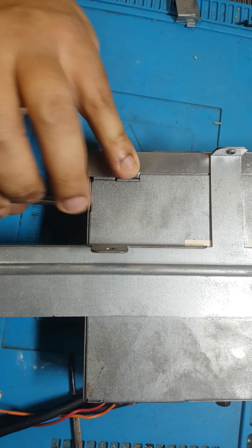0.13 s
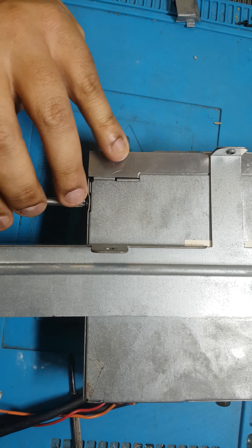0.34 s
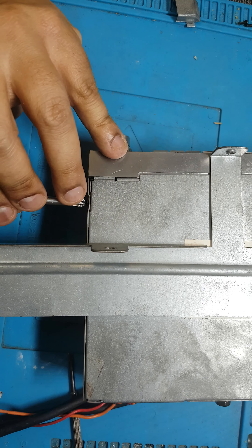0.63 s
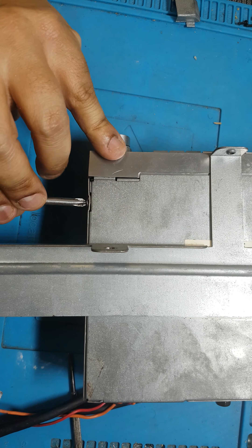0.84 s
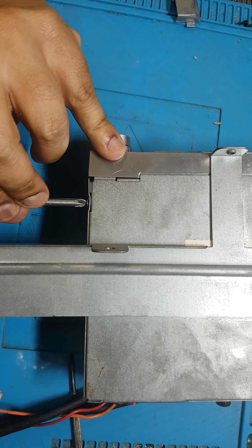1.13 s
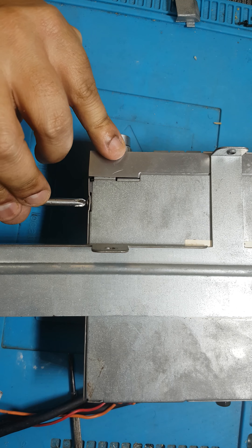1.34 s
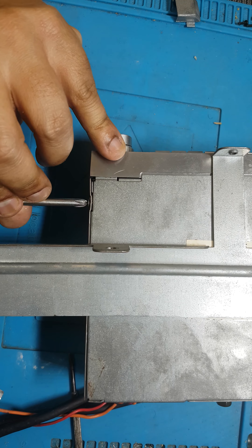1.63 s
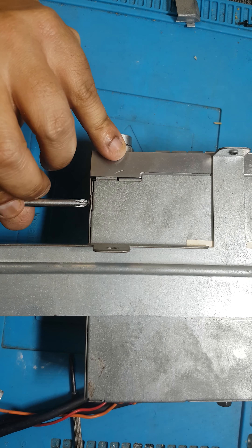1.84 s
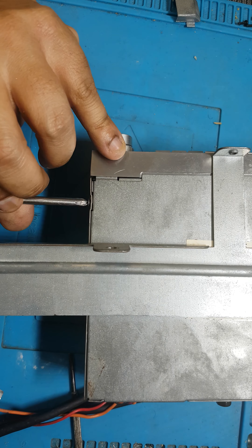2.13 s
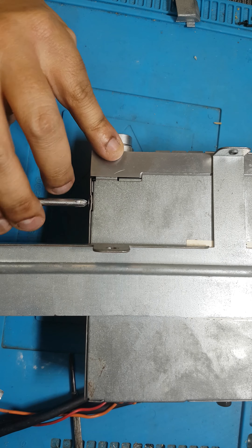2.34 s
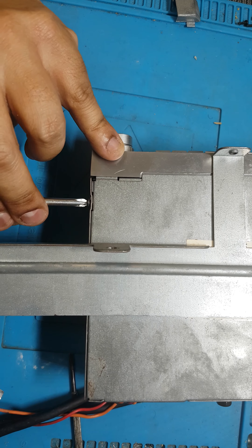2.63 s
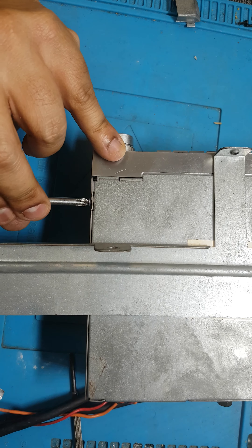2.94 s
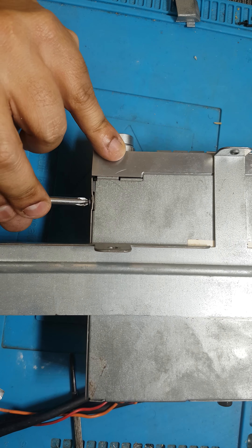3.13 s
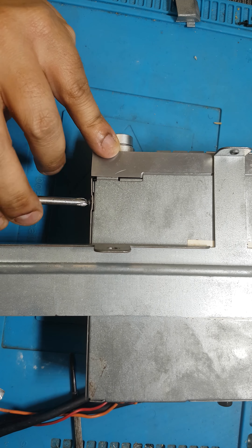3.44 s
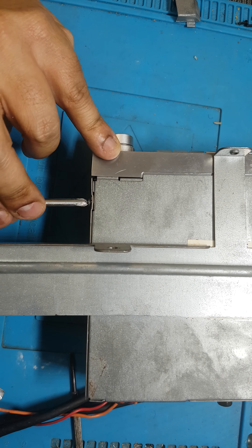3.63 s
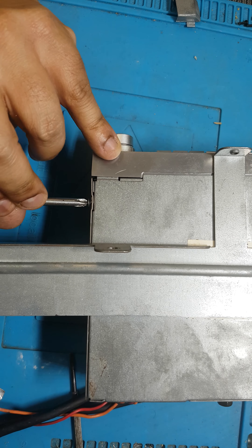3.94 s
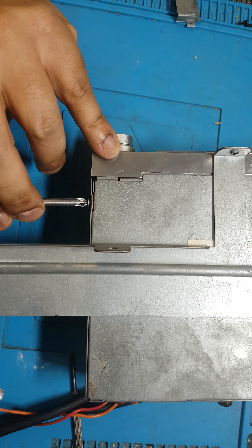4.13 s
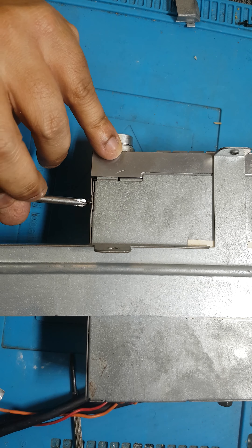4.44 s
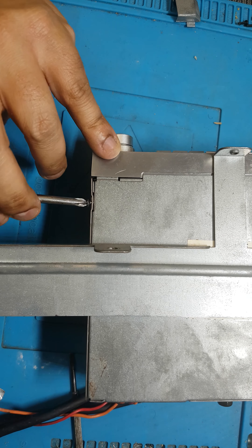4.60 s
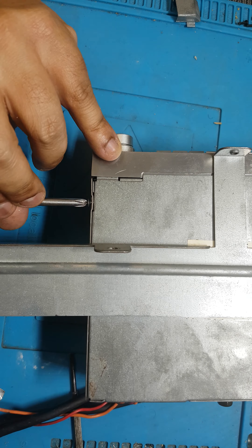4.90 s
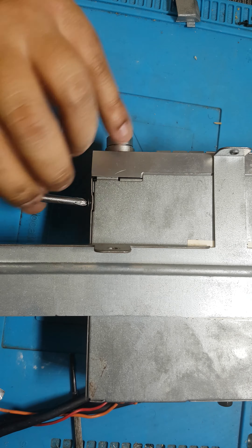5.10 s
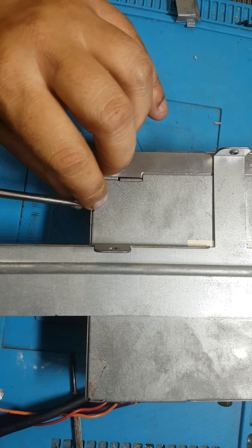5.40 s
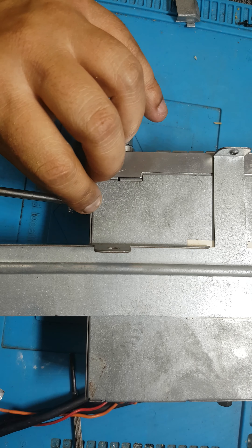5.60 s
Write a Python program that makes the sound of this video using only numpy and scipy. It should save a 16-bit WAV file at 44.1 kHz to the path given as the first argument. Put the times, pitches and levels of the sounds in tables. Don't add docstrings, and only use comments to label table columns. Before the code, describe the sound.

A steel screwdriver tip works at a thin metal box. Early on there are light taps, one sharper rattling knock and barely audible scrapes. Later, several much louder, short, boxy clacks burst out around four seconds, the lid bouncing back just after each. Then tiny bright clicks. The microphone is very near, the room dry and small, with a faint fan hum behind.

```python
import sys
import numpy as np
from scipy import signal
from scipy.fft import rfft, irfft
from scipy.io import wavfile
from scipy.ndimage import uniform_filter1d

SR = 44100
rng = np.random.default_rng(int(sys.argv[2]) if len(sys.argv) > 2 else 0)


def convert_level_to_amplitude(level_db):
    exponent = np.asarray(level_db, float) / 20
    return 10 ** exponent


def generate_wav(sig):
    pcm = np.round(np.clip(np.atleast_2d(sig).T, -1, 1) * 32767).astype(np.int16)
    wavfile.write(sys.argv[1], SR, pcm)


N = 254016

# freq_hz, density_db
ROOM_SPECTRUM = [(12, -40), (20, -10.5), (48, -4), (91, -6.5), (120, -8), (269, -7), (304, -13), (361, -15),
                 (534, -15.5), (1010, -21), (1230, -25), (1460, -25.5), (2560, -30), (7000, -42),
                 (9100, -70.5), (15400, -120)]
# freq_hz, correlation [0-1]
ROOM_LIKENESS = [(50, 0.97), (300, 0.87), (800, 0.3), (2000, 0), (5000, 0.15)]
# time_s, level_db
NOISE_SWELLS = [(0.0, -61), (0.38, -66), (0.8, -62.5), (1.17, -64.5), (1.62, -62), (2.05, -63), (2.47, -64),
                (3.0, -63.5), (3.34, -65), (3.82, -60), (3.93, -63), (4.35, -60.5), (4.47, -63.5),
                (5.18, -66.5), (5.42, -60), (5.76, -64.5)]
# centre_hz, width_hz, level_db
FAN_HUM = [(49, 18, -72), (167.6, 28, -74), (269.6, 32, -65.5), (1254, 47, -82)]
# freq_hz, density_db
HISS_SPECTRUM = [(3530, -29), (6000, -8.5), (9410, -8.5), (12000, -3.5), (14400, 0), (15100, 1.5),
                 (15800, -4.5)]
# start_s, level_db, pitch_hz, t60_s
SHAFT_RINGS = [
    (0., -55, 1998, 0.16),
    (2.063, -41.5, 1940, 0.051),
]
# start_s, box_db, note_hz, rattle_db, crack_db
BLOWS = [(0.098, -65, 598, -55, -54.5), (0.122, -41, 682, -46.5, -52), (1.0535, -22, 655, -23, -29.5),
         (2.063, -43, 627, -46, -55), (2.238, -46.5, 586, -54, -68), (3.045, -39, 581, -43.5, -80),
         (3.836, -37.5, 579, -43, -75), (3.399, -50, 620, -59.5, -80), (3.599, -38, 666, -43.5, -59.5),
         (3.6362, -8.5, 595, -20, -34.5), (4.2729, -7, 589, -20, -31.5), (4.648, -48, 566, -54.5, -87.5),
         (4.755, -13, 594, -26.5, -45.5), (4.7977, -6.5, 604, -21.5, -33), (5.299, -54, 661, -55.5, -63),
         (5.507, -48, 755, -57, -72.5)]
# start_s, box_db, note_hz, rattle_db, crack_db
RIM_BLOWS = [
    (1.6543, -36, 702, -27.5, -32.5),
    (4.231, -5.5, 593, -22, -33.5),
    (4.848, -24.5, 610, -29.5, -51),
]
# start_s, box_db, note_hz, rattle_db
BOUNCES = [(1.067, -20.5, 605, -34.5), (1.0745, -25.5, 680, -44.5), (3.067, -46, 600, -65.5),
           (3.654, -23.5, 745, -25), (3.854, -45, 590, -52), (4.248, -15, 633, -26),
           (4.289, -18, 590, -37.5), (4.302, -27, 590, -35), (4.774, -29.5, 610, -33),
           (4.817, -43, 610, -31), (4.859, -38, 563, -47)]
# start_s, box_db, note_hz
NUDGES = [(0.638, -56, 533), (0.837, -49, 690), (1.254, -56, 615), (1.501, -55, 590), (1.856, -38.5, 592),
          (2.128, -56, 600), (3.458, -59, 719), (3.488, -38.5, 662), (3.755, -50, 590), (4.05, -60, 613),
          (4.166, -45, 550), (5.336, -56.5, 545)]
# ratio [to note], share [signed], t60_s
BOX_MODES = [(0.699, .05, 0.051), (0.828, -0.35, 0.029), (1.0, 0.99, 0.078), (1.2, -0.27, 0.055),
             (1.52, 0.12, 0.061), (1.77, 0.027, 0.055)]
# freq_hz, level_db, t60_s
SHEET_MODES = [(1307, -6.5, 0.016), (1438, -12, 0.022), (1707, -8, 0.034), (2000, -6, .025),
               (2590, -4, 0.0088), (2904, -6, 0.027), (3367, -22, .02), (3614, -1, 0.021),
               (4264, -6.5, 0.026), (4630, -10, 0.041)]
# freq_hz, density_db
RATTLE_SPECTRUM = [(650, -25), (1100, -15.5), (1730, 0.5), (2240, -17), (2890, 0), (3210, -9), (3550, -6),
                   (3920, -12), (6000, -20), (7800, -42), (13200, -120)]
# freq_hz, density_db
CRACK_SPECTRUM = [(2940, -29.5), (5000, -13), (6200, -14.5), (7310, -3), (9020, -15.5), (14900, -6.5),
                  (16000, -22.5), (16500, -32)]
# freq_hz, level_db, t60_s
BENCH_MODES = [(121.8, -9, 0.11), (162, -2.5, 0.1), (268.4, 1, 0.08), (351, -7, 0.028)]
# start_s, level_db, centre_hz
CLICKS = [(3.045, -48, 2840), (3.8373, -43, 2850), (0.7794, -66, 5370), (1.6714, -57, 3590),
          (1.9669, -61, 3950), (2.0606, -53.5, 6620), (4.0679, -58, 2580), (4.2323, -24.5, 4200),
          (4.2476, -27, 4210), (4.3574, -51, 3920), (5.414, -58.5, 5000), (5.4391, -42.5, 9500),
          (5.4464, -50.5, 4430), (5.4553, -50.5, 7420), (5.5933, -51, 8500), (5.6117, -57, 5000)]
# start_s, length_s, level_db,
# line_hz, grit_share [0-1]
SCRAPES = [(1.964, 0.054, -72, 3670, .1), (1.966, 0.041, -67, 3930, .5), (2.17, .04, -79, 4500, .05),
           (2.27, .03, -78, 4500, .05), (2.415, 0.047, -74, 4430, 0.18), (4.358, 0.025, -56.5, 2220, 0.76),
           (4.358, 0.032, -65.5, 6900, 0.13), (4.358, 0.03, -63.5, 4100, 0.36),
           (1.04, 0.014, -60, 2900, 0.13), (4.644, 0.03, -59, 1620, 0.21), (4.835, 0.014, -40, 1320, .3),
           (5.584, 0.032, -71, 13000, .05), (1.654, 0.031, -51.5, 1300, 1), (5.435, 0.031, -60, 3700, 1),
           (1.052, 0.011, -38.5, 1700, 0.24), (4.865, 0.032, -67.5, 4000, 0.26)]


def decay(t, t60_s):
    return np.exp(-np.log(1000) * t / t60_s)


def peak(x, db):
    return x * convert_level_to_amplitude(db) / np.abs(x).max()


def level(x, db):
    return x * convert_level_to_amplitude(db) / np.sqrt(np.mean(x ** 2))


def along(table, hz):
    f, v = np.transpose(table)
    return np.interp(np.log(hz + 1e-9), np.log(f), v)


def shape(x, gain):
    hz = np.fft.rfftfreq(x.shape[-1], 1 / SR)
    return irfft(rfft(x) * gain(hz), x.shape[-1])


def hill(hz, centre_hz, octaves):
    return np.exp(-.5 * (np.log2((hz + 1e-9) / centre_hz) / octaves) ** 2)


def pair(size, likeness):
    mid, side = rng.standard_normal((2, size))
    c = np.clip(likeness, 0, 1)
    return np.sqrt(1 + c) * mid + np.sqrt(1 - c) * side * np.array([[1], [-1]])


def walk(rate_hz):
    k = int(SR / rate_hz)
    held = np.repeat(rng.standard_normal(N // k + 1), k)
    return 2.9 * uniform_filter1d(uniform_filter1d(held, k), k)[:N]


def add(out, start_s, x):
    i = max(int(start_s * SR), 0)
    out[:, i:i + x.shape[-1]] += x[..., :N - i]


def noise_swell_db():
    time_s, swell_db = np.transpose(NOISE_SWELLS)
    return np.interp(np.arange(N) / SR, time_s, swell_db - np.mean(swell_db))


def room_noise():
    bass_db = noise_swell_db()
    middle_db = 0.72 * bass_db
    out = 0
    for hz in 22 * 2. ** np.arange(9):
        noise = pair(N, along(ROOM_LIKENESS, hz))
        band = shape(noise, lambda f: convert_level_to_amplitude(along(ROOM_SPECTRUM, f)) * hill(f, hz, 0.67))
        swell_db = bass_db if hz < 400 else middle_db
        out = out + band * convert_level_to_amplitude(swell_db + walk(10))
    return level(out, -58.5)


def fan_hum():
    out = np.zeros((2, N))
    for hz, width_hz, db in FAN_HUM:
        hum = shape(pair(N, 0.88), lambda f: 1 / (1 + (2 * (f - hz) / width_hz) ** 2))
        out += level(hum, db)
    return out * convert_level_to_amplitude(noise_swell_db())


def microphone_hiss():
    top_hz = 15800
    hiss = shape(pair(N, 0.083), lambda f: convert_level_to_amplitude(along(HISS_SPECTRUM, f)) * (f < top_hz))
    return level(hiss, -77.5)


def shaft():
    out, t = np.zeros((2, N)), np.arange(SR // 4) / SR
    for start_s, db, hz, t60_s in SHAFT_RINGS:
        add(out, start_s, convert_level_to_amplitude(db) * decay(t, t60_s) * np.sin(2 * np.pi * hz * t))
    return out


def strikes():
    rows = [(*row, 1550) for row in BLOWS]
    rows += [(*row, 3700) for row in RIM_BLOWS]
    rows += [(s, box, hz, rattle, rattle - 11.5, 2950) for s, box, hz, rattle in BOUNCES]
    rows += [(s, box, hz, box - 21.5, box - 33, 1300) for s, box, hz in NUDGES]
    return rows


def box_note(t, note_hz, box_db, swell_s, light):
    grip_s, left_share = .0135, .1
    ratio, share, t60_s = np.transpose(BOX_MODES)[..., None]
    box = np.sum(share * decay(t, t60_s) * np.sin(2 * np.pi * ratio * note_hz * t), axis=0)
    held = t / (grip_s * (1 - 0.24 * light))
    grip = left_share + (1 - left_share) * np.exp(-held ** 4)
    onset = 1 - np.exp(-(t / (1.1 * swell_s)) ** 2)
    return peak(box * grip * onset, box_db) * convert_level_to_amplitude(np.array([[-1.1], [1.1]]))


def sheet_rings(t, contact, spot_hz):
    hz, db, t60_s = np.transpose(SHEET_MODES)[..., None]
    spot = rng.standard_normal((2, len(SHEET_MODES), 1))
    gain = convert_level_to_amplitude(db + 2.0 * spot[0]) * (.4 + hill(hz, spot_hz, 0.1))
    modes = gain * decay(t, t60_s) * np.sin(2 * np.pi * hz * (1 + 0.019 * spot[1]) * t)
    force = pair(len(t), 0.14) * contact
    return signal.fftconvolve(force, modes.sum(axis=0)[None])[:, :len(t)]


def blows():
    out, t = np.zeros((2, N)), np.arange(6144) / SR
    for start_s, box_db, note_hz, rattle_db, crack_db, spot_hz in strikes():
        swell_s = .0045 * np.clip((box_db - rattle_db) / 11., .35, 1)
        light = np.clip(-(box_db + 8.0) / 10.0, 0, 1)
        box = box_note(t, note_hz, box_db, swell_s, light)
        contact = (t / swell_s) ** 1.38 * np.exp(-1.5 * t / swell_s)
        rings = sheet_rings(t, contact, spot_hz)
        buzz = (1 - np.exp(-t / swell_s)) * decay(t, 0.048)
        rattle = shape(pair(len(t), 0.68),
                       lambda f: convert_level_to_amplitude(along(RATTLE_SPECTRUM, f)) * (.5 + hill(f, spot_hz, 0.56)))
        rattle = rattle * (contact + .9 * buzz)
        crack = shape(pair(len(t), 0.2896), lambda f: convert_level_to_amplitude(along(CRACK_SPECTRUM, f)))
        crack = crack * (contact + 0.34 * buzz)
        knock = shape(pair(len(t), 0.925), lambda f: hill(f, 650, 0.56))
        knock = knock * (contact + .5 * buzz)
        rough_db = 12.0 * light * np.clip((rattle_db - box_db + 24) / 12., 0, 1)
        box = box + peak(knock, box_db - 15.5 + rough_db)
        sheet = peak(rattle, 0) + peak(rings, -3)
        add(out, start_s - .66 * swell_s, box + peak(sheet, rattle_db) + peak(crack, crack_db))
    return out


def bench():
    thump_db, growth_db_per_db, tilt_scatter_db = -27, 0.644, 2
    out, t = np.zeros((2, N)), np.arange(8192) / SR
    hz, mode_db, t60_s = np.transpose(BENCH_MODES)[..., None]
    thumps = [(s, thump_db + growth_db_per_db * box) for s, box, *_ in BLOWS + RIM_BLOWS]
    thumps.append((3.837, -39))
    for start_s, db in thumps:
        tilt_db = tilt_scatter_db * rng.standard_normal()
        phase = 2 * np.pi * (hz * t + rng.random(hz.shape))
        gain = convert_level_to_amplitude(mode_db + tilt_db * np.log2(hz / 200))
        board = np.sum(gain * decay(t, t60_s) * np.sin(phase), axis=0)
        onset = 1 - np.exp(-(t / 0.0036) ** 2)
        add(out, start_s - .002, peak(board * onset, db))
    return out


def dry_tick(out, start_s, db, hz, octaves):
    t = np.arange(4096) / SR
    grit = shape(pair(len(t), 0.56), lambda f: hill(f, hz, octaves))
    burst = grit * (1 - np.exp(-t / 0.00038)) * decay(t, .025)
    add(out, start_s - .0003, peak(burst, db))


def lid_ticks():
    tick_db, growth_db_per_db = -2, 1.156
    late_s, heavy_late_s, heavy_db = .0006, 0.0033, -6
    out = np.zeros((2, N))
    for start_s, box_db, _, rattle_db, *_ in BLOWS + RIM_BLOWS + BOUNCES:
        delay_s = late_s + heavy_late_s * convert_level_to_amplitude(box_db - heavy_db)
        dry_tick(out, start_s + delay_s, tick_db + growth_db_per_db * rattle_db, 3300, 0.81)
    return out


def thin_clicks():
    out = np.zeros((2, N))
    for start_s, db, hz in CLICKS:
        dry_tick(out, start_s, db, hz, 0.52)
    return out


def scrapes():
    out, t = np.zeros((2, N)), np.arange(4096) / SR
    for start_s, length_s, db, hz, share in SCRAPES:
        slips = convert_level_to_amplitude(3.2 * np.repeat(rng.standard_normal(64), 64))
        gate = np.clip(t / 0.001, 0, 1) * np.clip((length_s - t) / (.5 * length_s), 0, 1)
        grit = shape(pair(len(t), 0.15) * slips,
                     lambda f: hill(f, hz, 0.02) + share * hill(f, hz, 0.49))
        add(out, start_s, level(grit, db) * gate)
    return out


def walls(x):
    t = np.arange(SR // 4) / SR
    tail = shape(pair(len(t), 0.5), lambda f: 1 / (1 + f / 3700.0))
    tail = tail * decay(t, 0.096) * np.clip(t / 0.011, 0, 1)
    tail *= convert_level_to_amplitude(-23) / np.sqrt(np.sum(tail[0] ** 2))
    return signal.fftconvolve(x.mean(axis=0)[None], tail)[:, :N]


def scene():
    near = shaft() + blows() + bench() + lid_ticks() + thin_clicks() + scrapes()
    air = near + walls(near) + room_noise() + fan_hum()
    air[1] = np.roll(air[1], shift=4)
    return air


def band_limit(x):
    return signal.sosfilt(signal.butter(12, 16800, fs=SR, output="sos"), x)


def record(dry):
    top_hz = 16700
    mix = shape(dry + microphone_hiss(), lambda f: f < top_hz)
    return band_limit(mix)


dry = scene()
out = record(dry)
generate_wav(out)
```